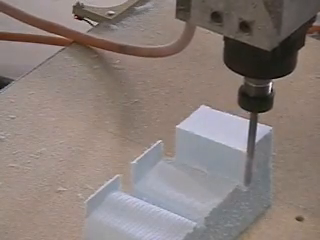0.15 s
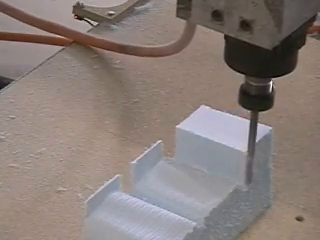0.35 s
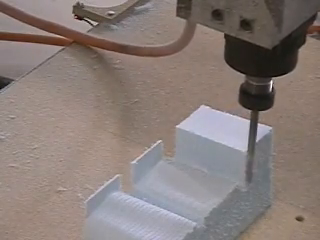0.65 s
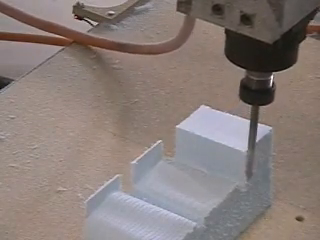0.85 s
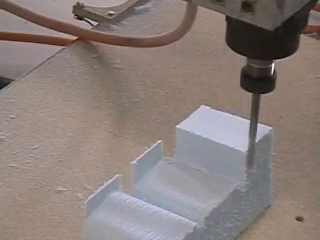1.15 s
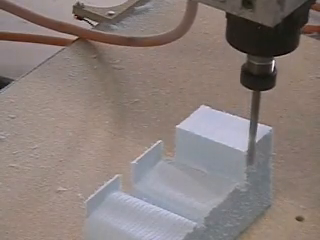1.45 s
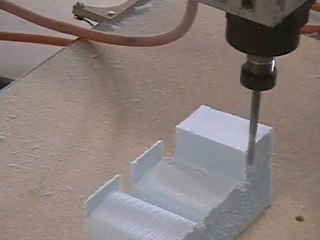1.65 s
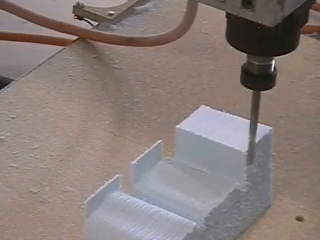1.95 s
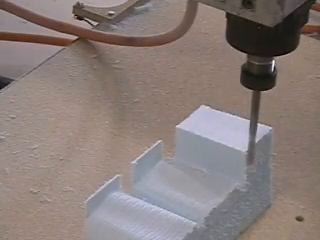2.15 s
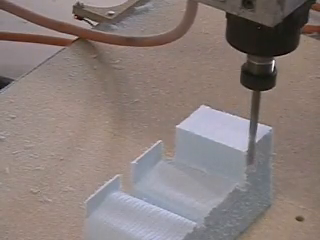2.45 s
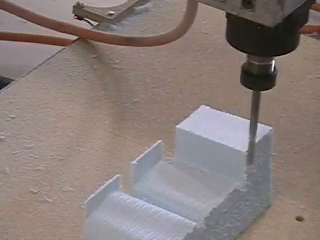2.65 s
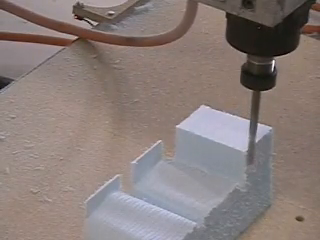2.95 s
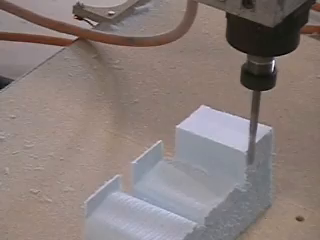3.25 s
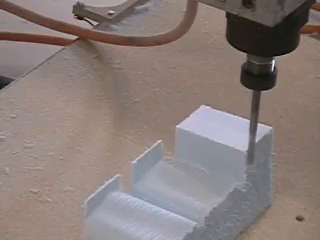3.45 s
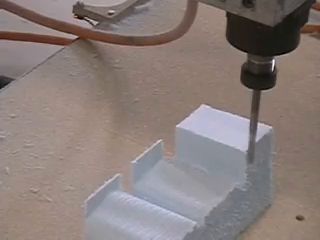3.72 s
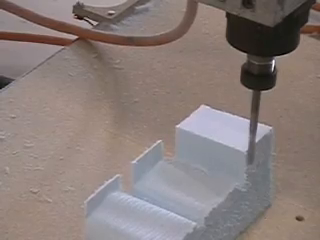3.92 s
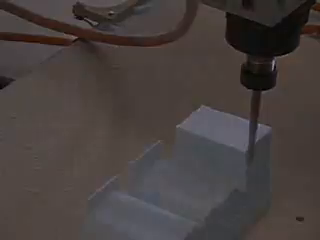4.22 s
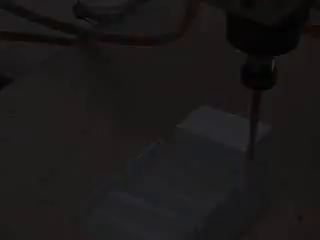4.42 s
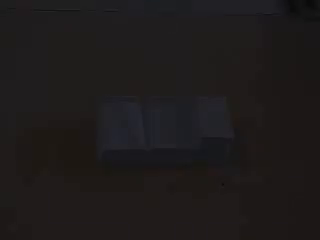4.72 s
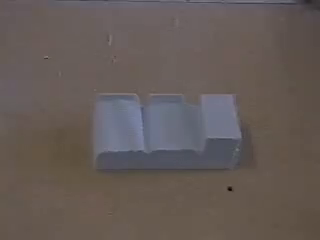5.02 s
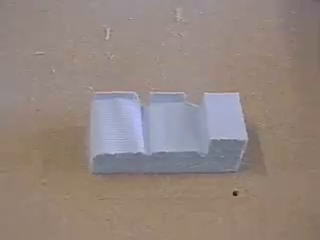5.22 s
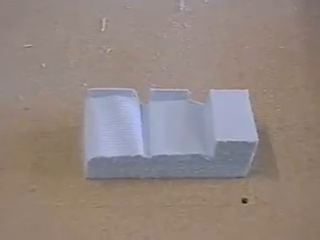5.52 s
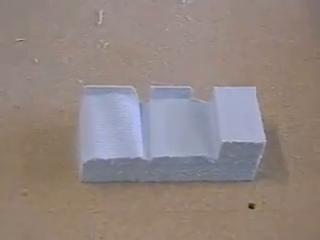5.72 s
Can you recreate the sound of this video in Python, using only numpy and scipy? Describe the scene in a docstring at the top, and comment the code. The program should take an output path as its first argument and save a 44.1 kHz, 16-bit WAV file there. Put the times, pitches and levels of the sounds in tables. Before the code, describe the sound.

Close to a camera microphone in a workshop, a fast spindle mills foam with a dense, steady tearing hiss and a strong fan whine. After about a second the whine begins sinking smoothly, swelling and weakening, while hollow air roar grows. Near 4.7 seconds everything stops abruptly, leaving faint ventilation, two softly beating drones and a brief rustle at the end.

```python
"""In a workshop, close to a camera's microphone, a high-speed spindle on a robot arm mills a foam block. The
cutter tears the foam with a dense hiss and rings; air roars through the hollows of the housing. The cooling fan
whines, a tone at the rate of its passing blades that sinks as the spindle slows. Then the scene changes at once
to the faint hum and air of the idle workshop: two drones beat slowly together, and a brief soft rustle follows."""
import sys
import numpy as np
from scipy import signal
from scipy.fft import rfft, irfft, next_fast_len
from scipy.io import wavfile
from scipy.ndimage import map_coordinates

SR = 44100
rng = np.random.default_rng(int(sys.argv[2]) if len(sys.argv) > 2 else 0)


def generate_wav(sig):
    """Save sig (samples, or channels by samples) to the path in sys.argv[1] as 16-bit PCM at SR."""
    pcm = np.round(np.clip(np.atleast_2d(sig).T, -1, 1) * 32767).astype(np.int16)
    wavfile.write(sys.argv[1], SR, pcm)


N = 258865

# blade tone through the fan cowl's resonances: (frequency [Hz], width [Hz], tone level [dB])
COWL_MODES = [(2395, 14, -25.3), (2345, 20, -23), (2312, 34, -16.8), (2234, 15, -17.8), (2208, 18, -18),
              (2180, 38, -18.5), (2138, 26, -25.5), (2072, 24, -27), (2038, 24, -26.5), (1592, 22, -25.5)]
# swell and sag of the fan's whine, mostly at full speed: (time [s], gain [dB])
WHINE_SWELL = [(0, -3), (.4, -0.5), (.85, -2), (1.22, -7), (1.33, 0.5)]
# shaft tone through the mount's resonance: (frequency [Hz], width [Hz], tone level [dB])
MOUNT_MODES = [(336, 11, -41.3)]
# hollows of the spindle housing: (frequency [Hz], width [Hz], relative level [dB])
HOUSING_MODES = [(432.5, 39, -9.5), (546, 59, 0), (617, 79, -1.5), (726, 29.5, -0.9), (900, 43, -6.5),
                 (952, 87, -3), (1319, 87, 4), (1376, 36, -5), (1437, 64, 1), (1605, 70, -10),
                 (1750, 160, -5), (1900, 70, -11), (3263, 64, -1)]
# the fan duct: (frequency [Hz], width [Hz], relative level [dB])
DUCT_MODES = [(2290, 114, 1), (2483, 71, 2.5)]
# air whistling at the collet: (frequency [Hz], width [Hz], relative level [dB])
COLLET_MODES = [(4650, 220, 2), (5670, 250, 2.5), (6700, 130, -1), (7470, 300, -5), (10900, 1100, -8)]
# colour of the torn foam: (frequency [Hz], relative level per Hz [dB])
FOAM_COLOUR = [(60, -45), (115, -26.5), (170, -18.5), (240, -12), (450, -8), (1100, 1), (2200, 4),
               (2500, -2), (2720, -2.5), (3050, 1), (3600, 1.5), (5200, -1.5), (6800, -7), (7800, -3.5),
               (11400, -6)]
# ringing of the cutter and its holder: (frequency [Hz], width [Hz], relative level [dB])
CUTTER_MODES = [(4810, 130, -3), (5640, 420, -4), (6356, 196, 1), (7140, 140, -2), (7440, 94, -1),
                (8950, 340, -11.5), (9640, 460, -13)]
# stereo width of the milling, the treble being centred: (frequency [Hz], side against middle [dB])
MILLING_WIDTH = [(200, -32), (450, -19), (950, -13.5), (1400, -13.5), (1780, -7.5), (2400, -9.5),
                 (2730, -15), (3100, -6.5), (3900, -6), (4200, -75)]
# low cut of the milling: (frequency [Hz], gain [dB])
LOW_CUT = [(35, -38), (100, 0)]
# colour of the idle workshop's air: (frequency [Hz], relative level per Hz [dB])
ROOM_COLOUR = [(12, -35), (30, -10), (70, 1), (200, -0.5), (350, 2), (600, -1.5), (1000, -7), (1500, -8),
               (1900, -15), (2350, -15), (3200, -22), (4500, -22.5), (5500, -29), (12400, -26.5)]
# stereo width of the idle workshop: (frequency [Hz], side against middle [dB])
ROOM_WIDTH = [(60, -11), (350, -12.5), (1100, -7), (2000, -5), (3800, -4), (4500, -22), (6500, -30),
              (11000, -18)]
# tones of idling machines: (frequency [Hz], level [dB], waver [dB])
MACHINE_HUM = [(57, -59.5, 3), (116, -59, 5), (742.5, -61, 0.5), (980, -61.5, 0.5), (1268, -69, 2),
               (1427, -68, 2), (4000, -70.5, 1), (8000, -71, .5), (10600, -74, 1), (10664, -78, 2)]
# a narrow band of ventilation noise: (frequency [Hz], width [Hz], relative level [dB])
VENT_MODES = [(327, 18, 0)]
# two beating drones: (frequency [Hz], level before the beat [dB], beat depth [0-1])
DRONES = [(246.8, -49, 0.35), (311, -51, 0.6)]
# colour of the rustle: (frequency [Hz], relative level per Hz [dB])
RUSTLE_COLOUR = [(400, -20), (2000, 8), (12000, 4), (14000, -37.5)]

CHANGE_S = 4.711
FULL_TURNS_PER_S, SLOW_FROM_S, BRAKE_TURNS_PER_S2 = 399.1, 1.319, 40.1
SHAFT_DB = -59  # the unbalance away from the mount's resonance
# levels at full speed [dB], and their change per whole share of speed lost [dB]
ROAR_DB, ROAR_SLOW_DB = -23.5, 17
DUCT_DB, DUCT_SLOW_DB = -22.5, -10.5
WHISTLE_DB, WHISTLE_SLOW_DB = -27, -105
RING_DB, RING_SLOW_DB = -28, 7.5
HISS_DB = -17.3  # the feed is steady, and so is the tearing of the foam
MILLING_TOP_HZ, TOP_HZ = 11490, 12450  # band limit of the milling, band limit of the whole
# the camera's gain control; the share is the part of the excess removed [0-1]
GAIN_THRESHOLD_DB, GAIN_SHARE, GAIN_TIME_S = -16, 0.52, 0.043
BEAT_PEAK_S, BEAT_PERIOD_S = 5.09, 0.63
RUSTLE_S, RUSTLE_ATTACK_S, RUSTLE_DB, RUSTLE_FADE_DB_PER_S = 5.685, 0.05, -56.5, 72


def amp(db):
    """Decibels to gain."""
    return 10 ** (np.asarray(db) / 20)


def unit(x):
    """Scale to rms 1."""
    return x / np.sqrt(np.mean(x ** 2) + 1e-20)


def along(points, hz):
    """Interpolate (frequency, value) points on a log axis."""
    f, v = np.transpose(points)
    return np.interp(np.log(hz + 1), np.log(f + 1), v)


def clock():
    """The time of each sample in seconds."""
    return np.arange(N) / SR


def curves(rows):
    """One value per sample for each column after the time."""
    s, *cols = np.transpose(rows)
    return [np.interp(clock(), s, c) for c in cols]


def wobble(rate):
    """A smooth random curve with rate knots a second."""
    knots = rng.standard_normal(int(N * rate / SR) + 4)
    return map_coordinates(knots, [clock() * rate])


def filtered(x, response):
    """Multiply the spectrum of x by a response of frequency."""
    m = next_fast_len(N + SR // 4)
    spectrum = rfft(x, m) * response(np.fft.rfftfreq(m, 1 / SR))
    return irfft(spectrum, m)[..., :N]


def resonances(modes):
    """The response of steep-sided resonances whose powers add."""
    def response(hz):
        power = 0
        for centre, width, db in modes:
            detuning = (hz * hz - centre * centre) / (np.pi / 2 * width * (hz + 1))
            power = power + (amp(db) / (1 + detuning ** 2)) ** 2
        return np.sqrt(power)
    return response


def stereo(pair, response, width=MILLING_WIDTH):
    """Colour two noises and spread them as middle and side, at rms 1."""
    def middle_and_side(hz):
        return response(hz) * np.array([np.ones_like(hz), amp(along(width, hz))])
    mid, side = filtered(pair, middle_and_side)
    return unit(np.array([mid + side, mid - side]))


def rush(response, width=MILLING_WIDTH):
    """Turbulent air: white noise through a response."""
    return stereo(rng.standard_normal((2, N)), response, width)


def tone(hz):
    """A sine of rms 1 that follows a pitch curve from a random phase."""
    cycles = np.cumsum(hz * np.ones(N)) / SR + rng.random()
    return np.sqrt(2) * np.sin(2 * np.pi * cycles)


def panned(x, left_db):
    """Make the left channel louder than the right by left_db."""
    return x * amp([[left_db / 2], [-left_db / 2]])


def spindle_speed():
    """Turns per second: steady, then a straight ramp down until the scene changes."""
    slowing_s = np.clip(clock(), SLOW_FROM_S, CHANGE_S) - SLOW_FROM_S
    return FULL_TURNS_PER_S - BRAKE_TURNS_PER_S2 * slowing_s


def spindle(speed, blade_count=6):
    """Shaft throbs once a turn, fan whines once a blade; each swells as it crosses a resonance."""
    blade_hz = blade_count * speed
    flutter = amp(1.3 * wobble(29.8) + 1.1 * wobble(130))
    swell_db, = curves(WHINE_SWELL)
    blade_level = amp(swell_db) * resonances(COWL_MODES)(blade_hz) * flutter
    blades = blade_level * tone(blade_hz + 2 * wobble(60))
    # the shaft's unbalance shakes the mount
    shaft = (amp(SHAFT_DB) + resonances(MOUNT_MODES)(speed)) * tone(speed)
    return panned(blades, left_db=-2.5) + shaft


def airflow(lost):
    """As speed is lost the housing roars more, the duct fades and the collet soon stops whistling."""
    roar_level = amp(ROAR_DB + ROAR_SLOW_DB * lost + 0.91 * wobble(16))
    roar = roar_level * rush(resonances(HOUSING_MODES))
    duct_level = amp(DUCT_DB + DUCT_SLOW_DB * lost + 0.78 * wobble(20))
    duct = duct_level * rush(resonances(DUCT_MODES))
    whistle = amp(WHISTLE_DB + WHISTLE_SLOW_DB * lost) * rush(resonances(COLLET_MODES))
    return panned(roar + duct, left_db=-0.3) + whistle


def cutting(speed, lost):
    """Countless foam cells burst under the flutes in uneven bites, and the cutter rings."""
    bite = amp(0.34 * tone(speed) + 0.59 * wobble(300) + 0.33 * wobble(9))
    bursts = bite * rng.standard_normal((2, N))
    hiss = amp(HISS_DB) * stereo(bursts, lambda hz: amp(along(FOAM_COLOUR, hz)))
    ring = amp(RING_DB + RING_SLOW_DB * lost) * rush(resonances(CUTTER_MODES))
    return hiss + ring


def reflected(x, echo_db, count=24):
    """The table, the arm and nearby walls return weak copies that comb the sound."""
    delay_s = 0.002 + 0.03 * rng.random(count)
    size = rng.standard_normal(count)
    walls = np.bincount((delay_s * SR).astype(int), size)
    walls *= amp(echo_db) / np.linalg.norm(walls)
    walls[0] = 1  # the direct sound
    return signal.fftconvolve(x, walls[None] / np.linalg.norm(walls), axes=1)[:, :N]


def gain_control(x):
    """The camera turns itself down as the level rises, so the hiss ducks under a loud whine."""
    keep = np.exp(-1 / (GAIN_TIME_S * SR))
    power = signal.lfilter([1 - keep], [1, -keep], np.mean(x ** 2, axis=0))
    excess_db = np.maximum(10 * np.log10(power + 1e-20) - GAIN_THRESHOLD_DB, 0)
    return x * amp(-GAIN_SHARE * excess_db)


def workshop():
    """Diffuse ventilation noise, wavering machine hum, thin electronic whistles, drones and a rustle."""
    air_level = amp(-46.0 + 0.4 * wobble(6.7))
    air = air_level * rush(lambda hz: amp(along(ROOM_COLOUR, hz)), ROOM_WIDTH)
    hum = sum(amp(db + waver_db * wobble(12)) * tone(hz + 0.65 * wobble(7.6))
              for hz, db, waver_db in MACHINE_HUM)
    vent = amp(-53) * rush(resonances(VENT_MODES), ROOM_WIDTH)
    return panned(air + hum + rustle(), left_db=0.4) + panned(drones() + vent, left_db=2.5)


def drones():
    """Two unsteady machine tones swell and fade in one slow beat."""
    beat = np.cos(2 * np.pi * (clock() - BEAT_PEAK_S) / BEAT_PERIOD_S)
    return sum(amp(db + 2.6 * wobble(16)) * (1 + depth * beat) * tone(hz + 1.2 * wobble(12))
               for hz, db, depth in DRONES)


def rustle():
    """A soft noise rises quickly and fades at a steady rate in decibels."""
    age = clock() - RUSTLE_S
    rise = np.clip(age / RUSTLE_ATTACK_S, 0, 1)
    fade = amp(-RUSTLE_FADE_DB_PER_S * np.maximum(age - RUSTLE_ATTACK_S, 0))
    return amp(RUSTLE_DB) * rise * fade * rush(lambda hz: amp(along(RUSTLE_COLOUR, hz)))


def scene():
    """The milling breaks off, with a short faint tail, and the scene changes to the quiet workshop."""
    speed = spindle_speed()
    lost = 1 - speed / FULL_TURNS_PER_S  # share of full speed
    noise = reflected(airflow(lost) + cutting(speed, lost), echo_db=-13)

    def band(hz):
        """A low cut thins the bass of the milling, which is kept below a sharp band limit."""
        return amp(along(LOW_CUT, hz)) * (hz < MILLING_TOP_HZ)

    milling = gain_control(filtered(spindle(speed) + noise, band))
    after = np.maximum(clock() - CHANGE_S, 0)
    tail = amp(-18.0 - 60 * (after / 0.061) ** 2)
    return np.where(after > 0, tail * milling + workshop(), milling)


def record(dry):
    """The camera's microphone channel keeps nothing above its band limit."""
    return filtered(dry, lambda hz: hz < TOP_HZ)


dry = scene()
out = record(dry)
generate_wav(out)
```